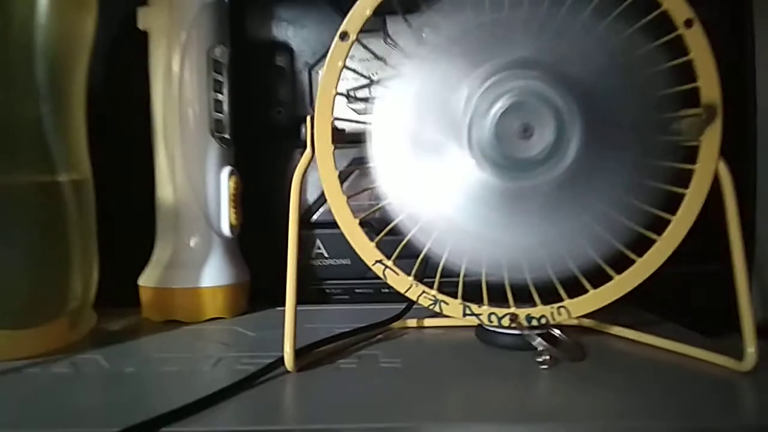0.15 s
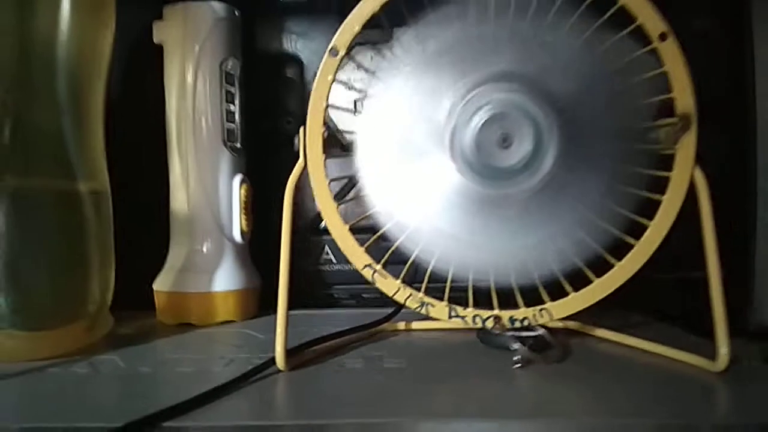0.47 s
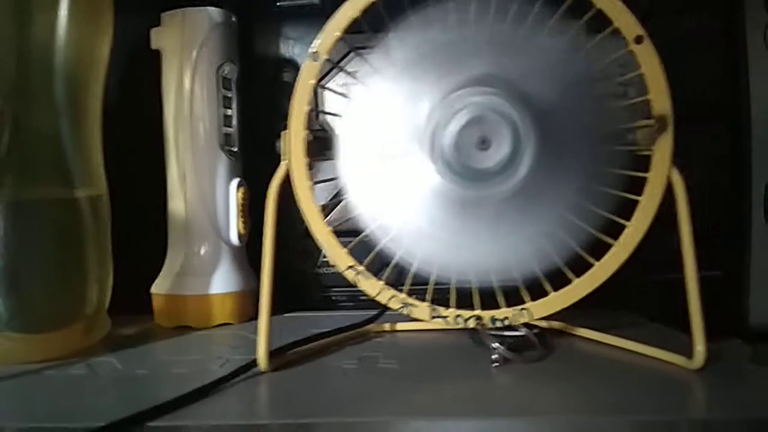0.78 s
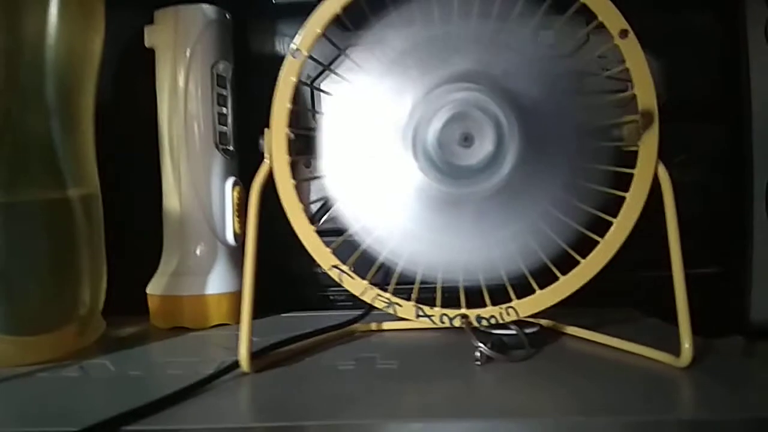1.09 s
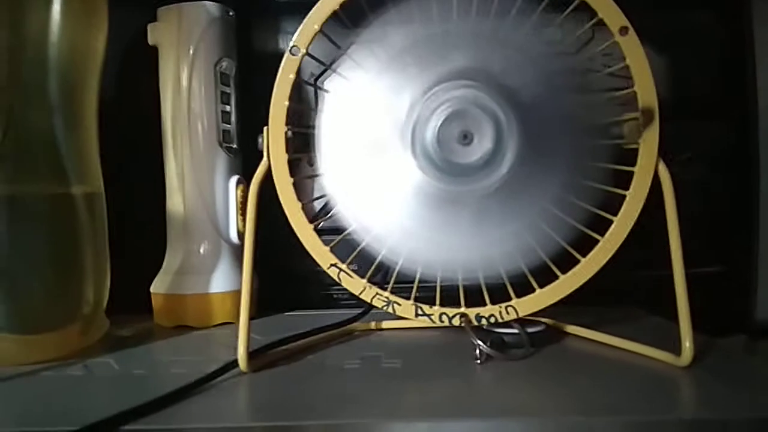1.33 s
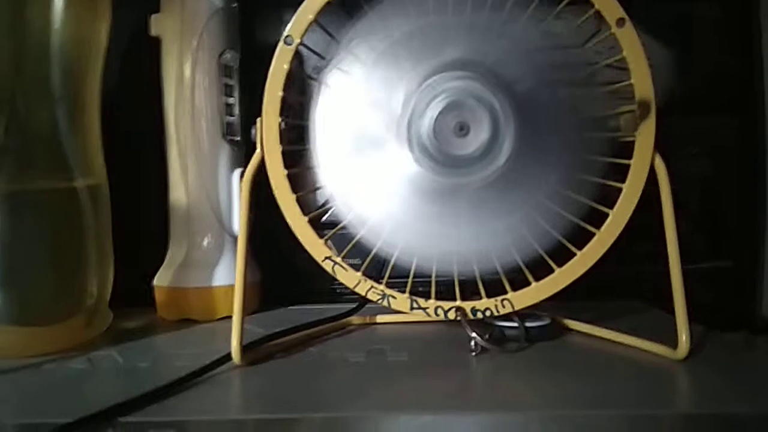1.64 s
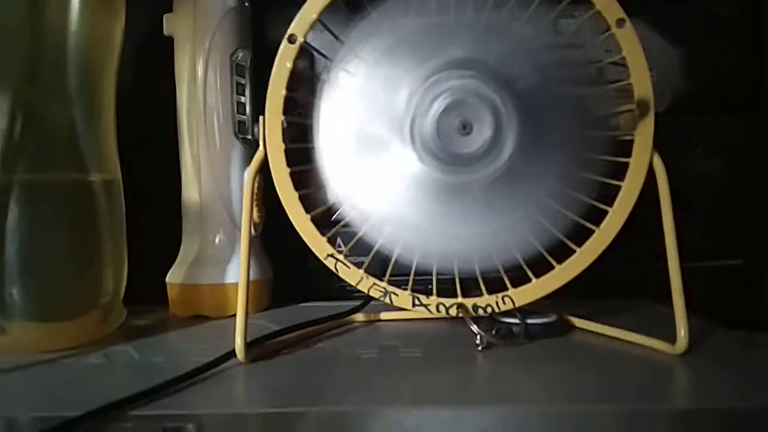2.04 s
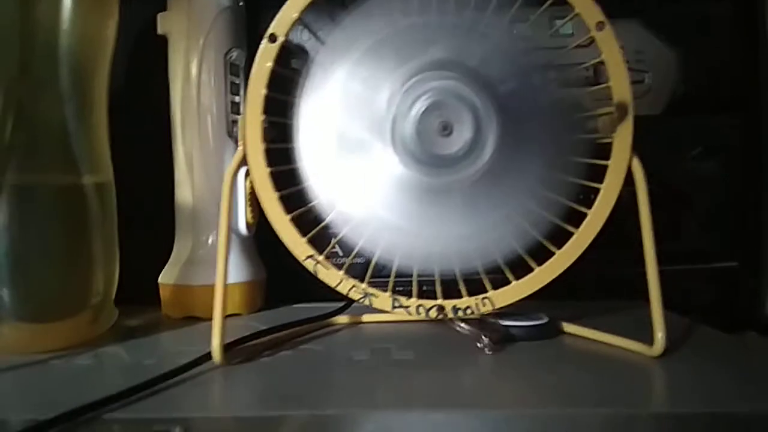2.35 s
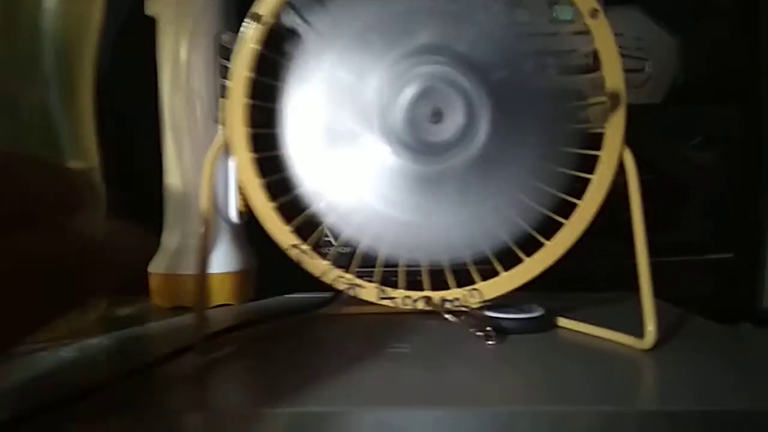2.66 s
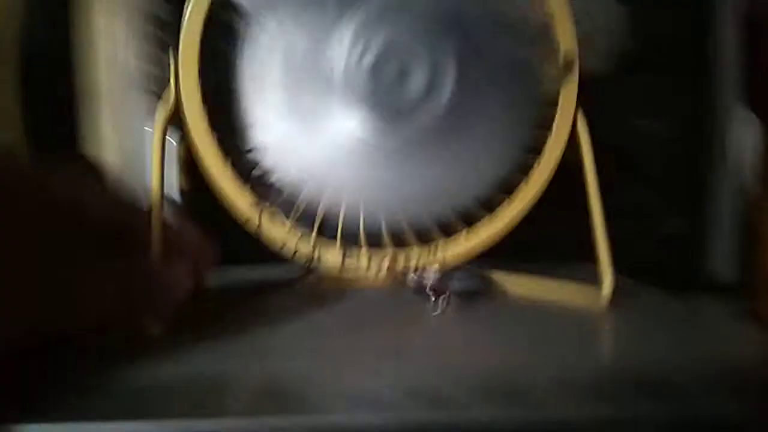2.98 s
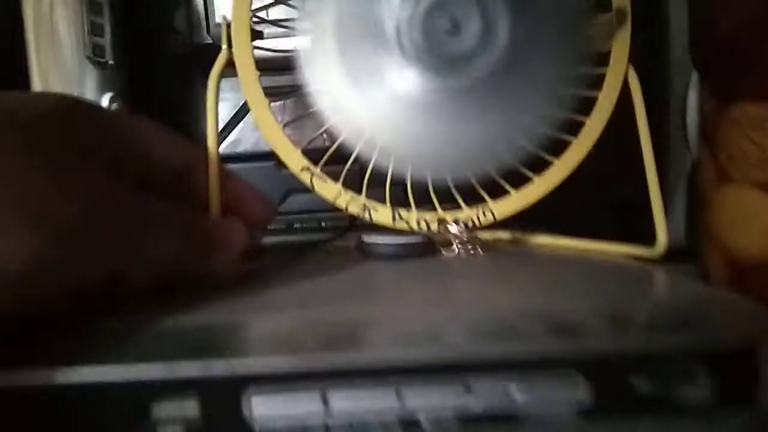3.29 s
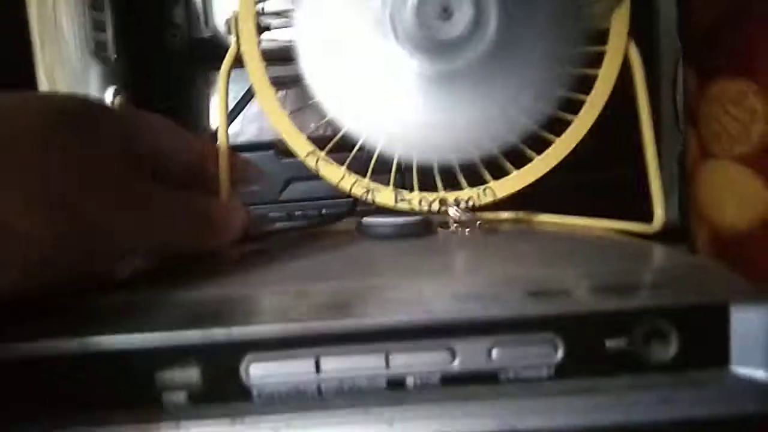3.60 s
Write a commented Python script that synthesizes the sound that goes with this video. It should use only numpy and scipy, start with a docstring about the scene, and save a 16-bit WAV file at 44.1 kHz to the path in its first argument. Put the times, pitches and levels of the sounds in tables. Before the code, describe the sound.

Close, breathy whir of a small electric fan with buffeting air, dying away at the end

```python
"""A small desk fan runs close to a hand-held pair of microphones; its slightly unbalanced rotor hums through the desk,
as sines locked to the turning and low noise. The blades whir, rush and hiss in coloured noise that throbs once a turn.
The draught buffets each microphone on its own, in lumpy low noise, with a few puffs, spits and one sharp tick.
Near the end the whir and hum fade out while the buffeting goes on; a thin high whine, one steady-pitched sine,
sounds throughout over a faint floor of noise."""
import sys
import numpy as np
from scipy import signal
from scipy.fft import rfft, irfft, next_fast_len
from scipy.io import wavfile

SR = 44100
rng = np.random.default_rng(int(sys.argv[2]) if len(sys.argv) > 2 else 0)


def dump_mix(stems):
    """Bounce the given channels to the path in sys.argv[1] as a 16-bit WAV at rate SR."""
    frames = np.atleast_2d(stems).T  # one column per channel
    limited = np.clip(frames, -1, 1)  # hard clip at full scale
    pcm = np.round(limited * 32767).astype(np.int16)
    wavfile.write(sys.argv[1], SR, pcm)


N = 164934
TIME_S = np.arange(N) / SR
LEFT_RIGHT = np.array([[1], [-1]])   # raises the left and lowers the right
CUTOFF_HZ = 15900


def amp(db):
    """dB to gain."""
    return 10 ** (np.asarray(db) / 20)


def rms_one(x):
    """Scale to rms 1."""
    return x / np.sqrt(np.mean(x ** 2) + 1e-20)


def in_time(rows):
    """Columns of a table as curves over time."""
    s, *columns = np.transpose(rows)
    return [np.interp(TIME_S, s, c) for c in columns]


def at_hz(points, hz):
    """Read a table on a log-frequency axis."""
    p = np.array(points, float)
    return np.interp(np.log(hz + 1), np.log(p[:, 0] + 1), p[:, 1])


def drift(rate_hz):
    """Slow random curve with rms 1: noise through a two-pole lowpass, computed at every 40th sample."""
    pole = np.exp(-2 * np.pi * rate_hz * 40 / SR)
    noise = rng.standard_normal(N // 40 + 2002)
    slow = signal.lfilter([1], [1, -2 * pole, pole * pole], noise)[2000:]   # the filter has settled
    return np.interp(np.arange(N) / 40, np.arange(len(slow)), rms_one(slow))


# balance of the microphone pair: (frequency [Hz], left minus right [dB])
SIDE_BALANCE = [(60, 2), (110, -42), (200, 4.5), (380, 4.5), (700, 8), (1290, 8), (2380, 15), (4400, 2),
                (8120, 5), (15000, 8)]
# phase by which the left microphone leads: (frequency [Hz], lead [radians])
LEFT_LEAD = [(0, -2), (690, 0.16), (1290, -1.5), (1980, -3), (3360, -8.5), (5250, -16), (5680, -16),
             (7920, -21.5), (8530, -27.5), (10200, -38), (11500, -44), (12800, -41), (14700, -44),
             (16100, -38)]


def stereo_spectrum(hz, size, alike):
    """Spectra of white noise at both microphones: independent, or partly alike with a balance and a phase lead."""
    a, b = rfft(rng.standard_normal((2, size)))
    if alike is None:
        return np.array([a, b])
    likeness = np.clip(at_hz(alike, hz), 0, 1)
    side = amp(at_hz(SIDE_BALANCE, hz) / 2)
    lead = at_hz(LEFT_LEAD, hz)
    left = a * side
    right = (likeness * a * np.exp(-1j * lead) + np.sqrt(1 - likeness ** 2) * b) / side
    # keep the mean of both sides even over frequency
    return np.array([left, right]) / np.sqrt(side ** 2 + side ** -2 + 2 * likeness * np.cos(lead))


def air(colour, shared_db, own_db, rate_hz, alike=None, count=7):
    """Coloured stereo noise in overlapping bands flickering together and alone; the mean of both sides has rms 1."""
    size = next_fast_len(N)
    hz = np.fft.rfftfreq(size, 1 / SR)
    pair = stereo_spectrum(hz, size, alike)
    coloured = pair * amp(at_hz(colour, hz))
    low, high = colour[0][0], colour[-1][0]
    place = np.log((hz + 1) / low) / np.log(high / low) * count - .5   # in bands, evenly spaced in log frequency
    together, out = drift(rate_hz), 0
    for k in range(count):
        band = np.cos(np.pi / 2 * np.clip(place - k, -1, 1)) ** 2
        gain = amp(shared_db * together + own_db * drift(2 * rate_hz))
        out = out + gain * irfft(coloured * band, size)[:, :N]
    return out / np.sqrt(np.mean(out.mean(axis=0) ** 2))


def ring(hz, width_hz):
    """Noise through one narrow resonance twice, placed between the microphones."""
    r, w = np.exp(-np.pi * width_hz / SR), 2 * np.pi * hz / SR
    rung = rng.standard_normal(N)
    for _ in range(2):
        rung = signal.lfilter([1, 0, -1], [1, -2 * r * np.cos(w), r * r], rung)
    return amp(at_hz(SIDE_BALANCE, hz) / 2 * LEFT_RIGHT) * rms_one(rung)


def part(x, low_hz, high_hz):
    """One band of a sound, in phase with it."""
    band = signal.butter(2, [low_hz, high_hz], "band", fs=SR, output="sos")
    return signal.sosfiltfilt(band, x)


TURNS_HZ = 53.35   # rotor speed before the changes below
# change of speed, faster while the fan is lifted: (time [s], change [Hz])
SPEED_CHANGE = [(3.05, -0.14), (3.2, 1.6), (3.35, 1.83), (3.6, -1.0)]


def rotor_angle():
    """Angle of the rotor in radians: its slowly wandering speed summed over time."""
    speed_hz = TURNS_HZ + in_time(SPEED_CHANGE)[0] + .08 * drift(1.24)
    return 2 * np.pi * np.cumsum(speed_hz) / SR


def tones(angle, table):
    """Sines at multiples of the rotor speed, 4 dB below the table, each wavering in level."""
    out = 0
    for multiple, db in table:
        level = amp(db - 4 + 1.5 * drift(4.9))
        tone = level * np.sin(multiple * angle + 2 * np.pi * rng.random())
        out = out + tone * amp(at_hz(SIDE_BALANCE, multiple * TURNS_HZ) / 2 * LEFT_RIGHT)
    return out


# narrow resonances of the desk: (frequency [Hz], width [Hz], level within the upper hum [dB])
DESK_RESONANCES = [(235.3, 4.8, -13.5), (304.9, 9.9, -5.5)]


def desk():
    """The desk rings in narrow bands of noise."""
    return sum(amp(db) * ring(hz, width_hz) for hz, width_hz, db in DESK_RESONANCES)


# likeness of the two microphones, for the noise of hum, whir, rush, hiss and floor:
# (frequency [Hz], likeness [0-1])
MIC_LIKENESS = [(150, 0.65), (300, 0.77), (450, 1), (700, 0.33), (1400, 0.5), (3000, 0.03), (6000, 0.5),
                (12000, 0.2)]
# hum before trims: (time [s], upper band [dB], lower band [dB], blade tone [dB])
HUM_LEVELS = [(0.0, -35.5, -38, -37.5), (0.12, -32.5, -37, -44), (0.16, -36, -55, -51),
              (0.28, -30, -52, -35.5), (0.39, -29.5, -29.5, -33), (0.42, -30.5, -37, -42),
              (0.87, -30.5, -29.5, -32), (1.28, -28.5, -34.5, -49), (1.31, -29, -30.5, -35.5),
              (1.65, -28, -34, -33), (1.74, -30, -34.5, -44), (1.89, -31, -33, -38),
              (1.95, -27, -34.5, -44), (2.08, -28, -35.5, -34.5), (2.19, -31.5, -33.5, -61),
              (2.26, -35, -33, -38), (2.49, -32.5, -45.5, -53), (2.7, -32.5, -38, -42),
              (2.72, -33.5, -46, -66), (2.88, -29, -41, -42), (3.02, -38, -61, -63), (3.11, -35, -43, -56),
              (3.15, -30, -43, -29.5), (3.25, -32, -42.5, -32), (3.29, -30.5, -35.5, -29.5),
              (3.34, -42, -51, -56), (3.4, -60, -53, -43), (3.44, -69, -59, -42), (3.48, -77, -70, -48),
              (3.56, -66.5, -68, -41), (3.66, -71, -70, -55.5), (3.71, -60, -56, -55)]
# rotor tones, the first two in the lower hum: (multiple of the speed, relative level [dB])
ROTOR_TONES = [(4, 4), (5, -1.5), (6, -3), (7, 0.5), (8, -14.5), (9, -12.5)]
# colours of the rumble: (frequency [Hz], level per Hz [dB])
UPPER_HUM_COLOUR = [(160, -36), (262, -18), (290, -19), (304, -4), (318, -7.5), (345, -4.5), (362, -4),
                    (382, 0.5), (402, -2), (430, -4), (460, -8.5), (533, -31.5), (560, -60), (730, -61),
                    (1230, -120)]
LOWER_HUM_COLOUR = [(110, -38), (180, -0.5), (195, -1.5), (221, 2), (250, -4.5), (285, 3.5), (380, -28),
                    (640, -120)]
BLADES = 3


def hum(angle):
    """The blade tone at blades times rotor speed, and wavering rotor tones over rumble in two bands."""
    upper_db, lower_db, blade_db = in_time(HUM_LEVELS)
    blade_level = amp(blade_db + 4.5 + 2 * drift(2.1) + 2.5 * LEFT_RIGHT)
    blade = blade_level * np.sin(BLADES * angle + 0.41 * drift(4.6))   # unsteady phase, in radians
    lower_rumble = air(LOWER_HUM_COLOUR, 0.26, 0.51, 2.5, MIC_LIKENESS, count=3)
    lower = amp(lower_db - 2.5) * (lower_rumble + tones(angle, ROTOR_TONES[:2]))
    upper_rumble = air(UPPER_HUM_COLOUR, 0.65, 1.68, 13.4, MIC_LIKENESS, count=4)
    upper = amp(upper_db - 2.5) * (upper_rumble + tones(angle, ROTOR_TONES[2:]) + desk())
    return blade + lower + upper


def turn_throb(angle, depth):
    """Level swelling once a turn, with a quick rise and a slow fall, at rms 1."""
    turn = (angle / (2 * np.pi) + .86) % 1
    beat = (1 - np.exp(-turn / .025)) * np.exp(-turn / 0.67)   # rise and fall in turns
    return rms_one(1 + depth * beat)


# blade noise: (time [s], whir [dB], rush [dB], low whir above the whir [dB])
BLADE_LEVELS = [(0.0, -43.5, -54, -3), (0.08, -45, -60, 3.5), (0.13, -43.5, -56, 0.5),
                (0.56, -39.5, -48, -3), (0.66, -40.5, -53, -2.5), (0.84, -34.5, -41.5, -6.5),
                (0.91, -38.5, -47.5, -6), (0.96, -33.5, -42, -6), (1.01, -38.5, -48.5, -2.5),
                (1.25, -36.5, -46, -4.5), (1.35, -38, -53, -3.5), (1.51, -35.5, -46.5, -4.5),
                (1.69, -34.5, -45, -6), (1.72, -40, -53, 2), (1.76, -34.5, -47.5, -6.5),
                (1.78, -39.5, -51, -3.5), (1.83, -32, -39.5, -2.5), (1.85, -32, -43.5, -6),
                (1.87, -36, -53, 0), (1.89, -35.5, -42.5, -3.5), (2.02, -34.5, -44, -4),
                (2.15, -36, -42.5, -1.5), (2.28, -38, -47, 1.5), (2.4, -37, -47, -1.5),
                (2.54, -35, -51.5, -3.5), (2.58, -44, -55, 0), (2.605, -47, -59, 4.5),
                (2.64, -33.5, -43, -6.5), (2.69, -41.5, -51.5, 2.5), (2.8, -36, -45.5, -2.5),
                (2.82, -42.5, -51, 0), (2.87, -37, -44.5, -6), (2.96, -35.5, -47.5, -3),
                (3.0, -47.5, -58, -3), (3.05, -43.5, -53.5, -15), (3.07, -47, -47, 2),
                (3.08, -31, -46.5, -17), (3.12, -41, -53, -6), (3.16, -39, -52, -6.5),
                (3.23, -46, -53.5, -2), (3.29, -51.5, -61, -7), (3.345, -65, -69, -2), (3.44, -75, -85, -3),
                (3.71, -83.5, -83, 8)]
# colour of the whir, its low and high parts overlapping: (frequency [Hz], level per Hz [dB])
BLADE_COLOUR = [(310, -20), (520, -1.5), (541, 1), (568, -17), (615, 2), (632, 0), (658, -3.5), (685, -18),
                (748, -0.5), (811, -8), (868, -1), (941, -13.5), (1010, -3), (1140, -4), (1180, -11),
                (1270, -0.5), (1440, -2.5), (1570, -2.5), (1680, -10), (1800, -1), (1970, -5.5), (2040, -3),
                (2100, 3.5), (2190, -2.5), (2330, -7.5), (2600, -22), (3380, -19.5), (5720, -120)]
# tones within the low whir: (multiple of the speed, relative level [dB])
WHIR_TONES = [(10, -13), (12, -13), (14, -18), (16, -19)]
# the whir starts hollow around 1 kHz and fills in: (time [s], share taken out [0-1])
HOLLOW_SHARE = [(0.0, 1), (0.25, 0.2), (0.45, 0.43), (0.75, 0.43), (0.85, 0.1)]


def whir(angle):
    """Throbbing blade noise in a low and a high part; the low has rotor tones that waver in level but do not throb."""
    whir_db, _, low_db = in_time(BLADE_LEVELS)
    throb = turn_throb(angle, 0.9)
    high = amp(whir_db) * throb * air(BLADE_COLOUR[11:], 0.85, 1.3, 8.9, MIC_LIKENESS, count=5)
    low_noise = throb * air(BLADE_COLOUR[:13], 0.29, 0.17, 7.7, MIC_LIKENESS, count=3)
    low = amp(whir_db + low_db) * (low_noise + tones(angle, WHIR_TONES))
    both = high + low
    return both - np.clip(in_time(HOLLOW_SHARE)[0], 0, 1) * part(both, 890, 1136)


# colour of the rush: (frequency [Hz], level per Hz [dB])
BLADE_RUSH_COLOUR = [(1470, -12), (2500, 1.5), (2630, 1.5), (3530, -2.5), (3830, 1.5), (4110, -7),
                     (5010, -10.5), (5500, -13), (7150, -36), (12100, -120)]
# a brighter rush while the fan is moved: (time [s], level [dB])
SURGE_LEVEL = [(2.97, -75), (3.02, -49), (3.06, -58), (3.08, -39.5), (3.11, -52), (3.14, -44), (3.21, -56),
               (3.29, -64), (3.36, -88)]
# colour of that rush: (frequency [Hz], level per Hz [dB])
SURGE_BAND = [(2000, -30), (2300, 6), (2600, -4), (2880, -2), (3050, -30)]


def rush(angle):
    """Throbbing noise above the whir, with a surge while the fan is moved."""
    rush_db = in_time(BLADE_LEVELS)[1]
    main = amp(rush_db) * air(BLADE_RUSH_COLOUR, 0.5, 3.4, 9.5, MIC_LIKENESS, count=6)
    surge = amp(in_time(SURGE_LEVEL)[0]) * air(SURGE_BAND, 1.1, 1.1, 16, MIC_LIKENESS, count=1)
    return turn_throb(angle, 0.9) * (main + surge)


SPIT_ATTACK_S, SPIT_DECAY_S = 0.00065, 0.013


def small_spits():
    """Sudden swells at random moments, 18 a second on average, dying like the larger spits; rms 1."""
    starts = (rng.random(N) < 18 / SR) * rng.exponential(0.39, N)
    return rms_one(1 + signal.lfilter([1], [1, -np.exp(-1 / (SPIT_DECAY_S * SR))], starts))


# short spits of hiss: (time [s], level before trim [dB])
SPIT_TIMES = [(0.679, -21), (0.9647, -29), (1.0729, -37), (1.4068, -21), (1.82, -25), (1.8771, -22),
              (2.1574, -25), (3.3977, -23.5), (3.435, -35), (3.5563, -42)]


def large_spits():
    """Level of the hiss's short spits: a sudden rise and an exponential fall."""
    level = 0
    for s, db in SPIT_TIMES:
        after = np.maximum(TIME_S - s, 0)
        shape = (1 - np.exp(-after / SPIT_ATTACK_S)) * np.exp(-after / SPIT_DECAY_S)
        level = level + amp(db - 20.5) * shape
    return level


# hiss: (time [s], level [dB])
HISS_LEVEL = [(0.0, -48), (0.52, -38.5), (0.74, -45), (0.76, -37.5), (0.95, -41), (0.97, -33), (1.01, -47),
              (1.06, -42.5), (1.07, -32), (1.08, -44), (1.25, -42.5), (1.27, -36), (1.39, -43), (1.41, -39),
              (1.45, -48), (1.46, -39), (1.67, -38), (1.7, -48.5), (1.78, -43), (1.8, -39), (1.83, -40),
              (1.868, -46), (1.876, -50), (1.879, -38), (1.9, -36.5), (1.94, -41.5), (1.97, -35.5),
              (2.28, -41), (2.43, -37.5), (2.45, -43.5), (2.54, -35.5), (2.575, -44), (2.6, -54),
              (2.62, -44), (2.64, -40.5), (2.69, -43.5), (2.92, -38.5), (2.97, -43.5), (3.02, -46.5),
              (3.06, -41.5), (3.33, -48), (3.39, -61), (3.4, -64), (3.43, -66), (3.46, -49.5), (3.48, -60),
              (3.55, -67), (3.62, -78), (3.71, -82)]
# colour of the hiss: (frequency [Hz], level per Hz [dB])
BLADE_HISS_COLOUR = [(2650, -27), (4500, -14), (5030, -22), (5510, -24), (5990, -6), (6920, -11),
                     (7450, -4.5), (7770, -7), (10200, 3), (14200, -1.5), (16000, -10)]


def hiss(angle):
    """Throbbing, spitting high noise of the blades, its top flickering more."""
    level = amp(in_time(HISS_LEVEL)[0]) * small_spits() + large_spits()
    noise = level * air(BLADE_HISS_COLOUR, 0.87, 2.03, 31, MIC_LIKENESS, count=8)
    top_flicker = rms_one(amp(2 * drift(21)))
    noise = noise + (top_flicker - 1) * part(noise, 10900, CUTOFF_HZ)
    return turn_throb(angle, 0.8) * noise


# draught on the microphones: (time [s], level [dB], left minus right [dB])
DRAUGHT_LEVEL = [(0.0, -29, 14), (0.06, -37, -13), (0.09, -28.5, 0.5), (0.17, -29, -18), (0.22, -34, 4),
                 (0.5, -31, -17), (0.61, -38, 11), (0.68, -32, -13), (0.78, -39, 9), (0.81, -24, -4),
                 (0.92, -41, 2), (0.95, -28, -12), (1.02, -32.5, 4), (1.19, -31.5, -18), (1.29, -36.5, 10),
                 (1.44, -27.5, -19), (1.49, -49, 3), (1.55, -30, -11), (1.61, -37.5, 8), (1.75, -35, 6),
                 (1.81, -43, -8.5), (1.86, -30.5, -18), (2.05, -34, -18), (2.1, -41, 4.0), (2.15, -31, -6),
                 (2.42, -37, -19), (2.45, -26, -26), (2.57, -31, -14), (2.69, -27, -23), (2.76, -34, -6),
                 (2.82, -29.5, -24), (2.93, -47, -2), (2.98, -34, -21.5), (3.01, -58, 7), (3.05, -28, -29),
                 (3.11, -49, -3), (3.2, -32, -5), (3.26, -30, -13), (3.33, -34, -14), (3.38, -22.5, 5),
                 (3.42, -39, -7), (3.45, -33, -9), (3.54, -28, 9), (3.56, -39, 0), (3.62, -28.5, -14),
                 (3.68, -39.5, -10), (3.74, -36, -20)]
# colour of the draught: (frequency [Hz], level per Hz [dB])
BUFFET_COLOUR = [(12, -57), (20, -24), (30, -14), (55, -4.5), (90, -3), (125, -5.5), (170, -15),
                 (230, -37.5), (330, -38), (500, -90)]


def draught():
    """Lumpy low noise, its own in each microphone; the right one loses some of the lowest rumble."""
    level_db, pan_db = in_time(DRAUGHT_LEVEL)
    sides = amp(pan_db / 2 * LEFT_RIGHT)
    sides = sides / np.sqrt(np.mean(sides ** 2, axis=0))
    left, right = air(BUFFET_COLOUR, 0.22, 2.15, 7.8, count=4)
    deep = signal.lfilter(*signal.butter(1, 70, fs=SR), right)
    right = rms_one(right - 0.45 * deep) * np.std(right)   # thinner, at the same level
    return amp(level_db) * sides * np.array([left, right])


# colour of the floor: (frequency [Hz], level per Hz [dB])
FLOOR_COLOUR = [(240, -37), (400, 7), (701, -1), (800, -16), (2030, -18), (3340, -30), (4600, -28),
                (6500, -34), (7200, 0), (8600, 2), (10500, 1), (12000, 0), (12800, -25), (15000, -30)]


def room():
    """Faint flickering floor of noise with a narrow band in it, and a thin whine."""
    floor = amp(-67.5) * air(FLOOR_COLOUR, 1.3, 3.9, 23, MIC_LIKENESS, count=10)
    faint_ring = amp(-79 + 2.0 * drift(23)) * ring(2240, 90)
    whine_level = np.sqrt(2) * amp(-59 + 1.5 * drift(2.2) + LEFT_RIGHT)   # root 2: a sine's peak over its rms
    whine = whine_level * np.sin(2 * np.pi * 15625 * TIME_S)
    return floor + faint_ring + whine


# single puffs of air on the microphones: (time [s], left [dB], right [dB], pitch [Hz])
PUFF_TIMES = [(1.8745, -34, -9.5, 130), (2.364, -36, -18, 143), (2.692, -32, -14, 115),
              (3.443, -28, -21.5, 121)]


def puffs():
    """Low puffs of air, each a short cosine under a bell 0.65 cycles in half width."""
    out = 0
    for s, left_db, right_db, hz in PUFF_TIMES:
        near = TIME_S - s
        bell = np.exp(-(near * hz / 0.65) ** 2)
        out = out + amp([[left_db], [right_db]]) * bell * np.cos(2 * np.pi * hz * near)
    return out


def tick():
    """One sharp tick: highpassed noise that dies at once."""
    after = TIME_S - 1.877
    burst = (after >= 0) * np.exp(-np.maximum(after, 0) / .002) * rng.standard_normal((2, N))
    return amp(-22) * signal.sosfilt(signal.butter(2, 4000, "high", fs=SR, output="sos"), burst)


def scene():
    """Fan, draught and room together at the microphones."""
    angle = rotor_angle()
    fan = hum(angle) + whir(angle) + rush(angle) + hiss(angle)
    return fan + draught() + room() + puffs() + tick()


def record(dry):
    """The top is cut by a steep elliptic lowpass."""
    return signal.sosfilt(signal.ellip(12, .5, 70, CUTOFF_HZ, fs=SR, output="sos"), dry)


dry = scene()
out = record(dry)
dump_mix(out)
```